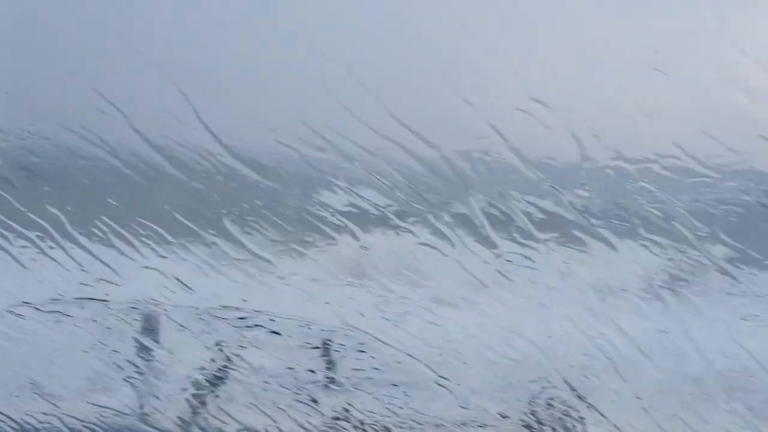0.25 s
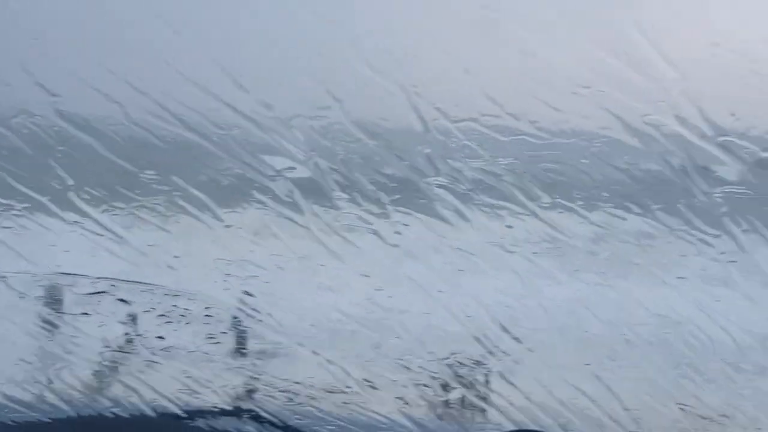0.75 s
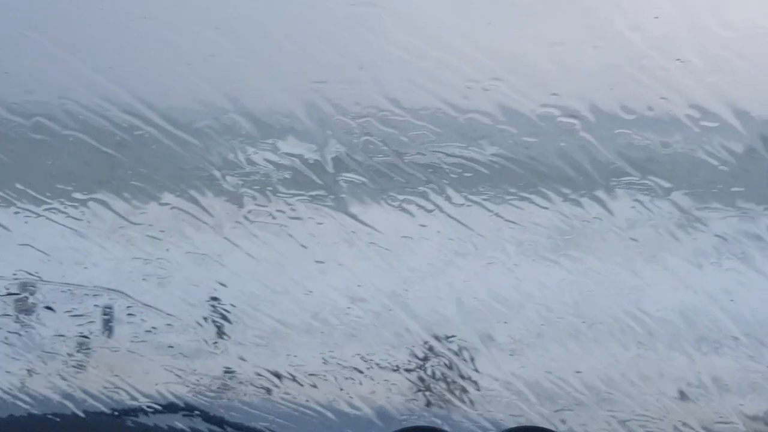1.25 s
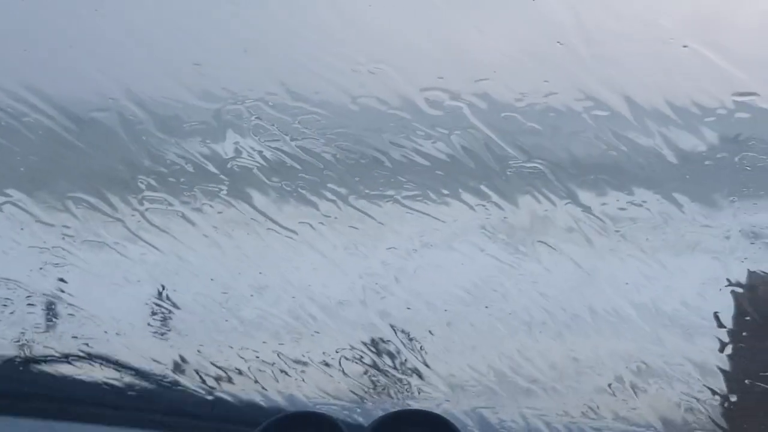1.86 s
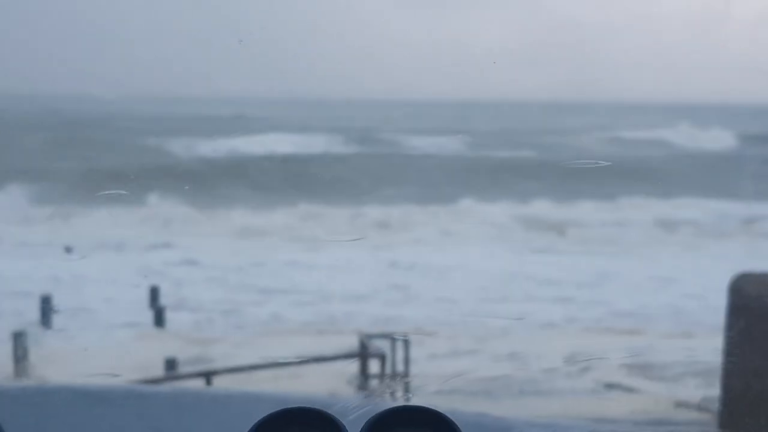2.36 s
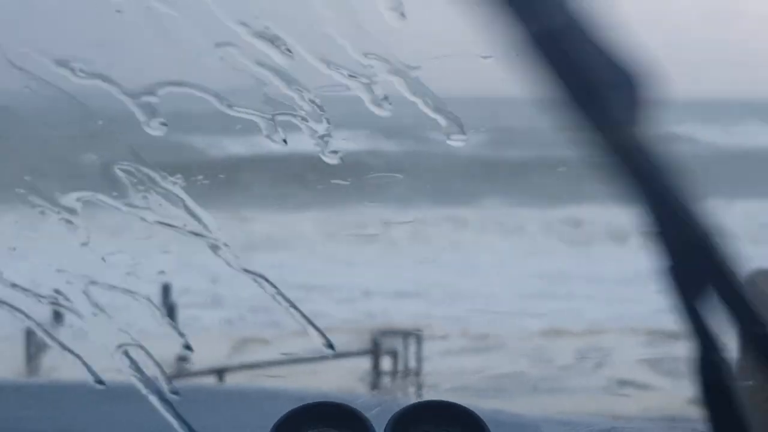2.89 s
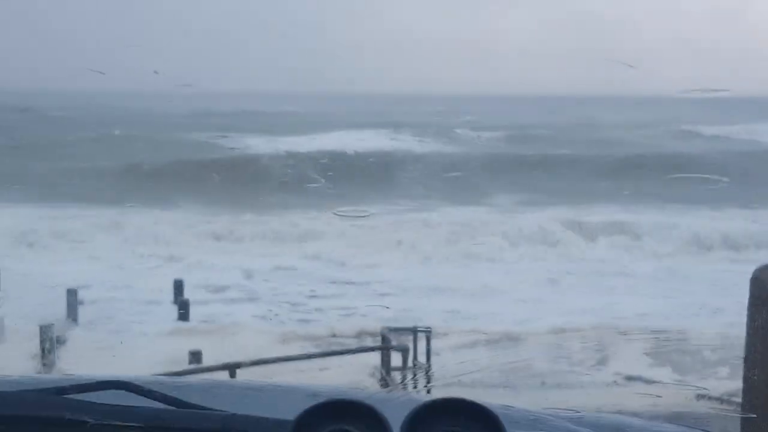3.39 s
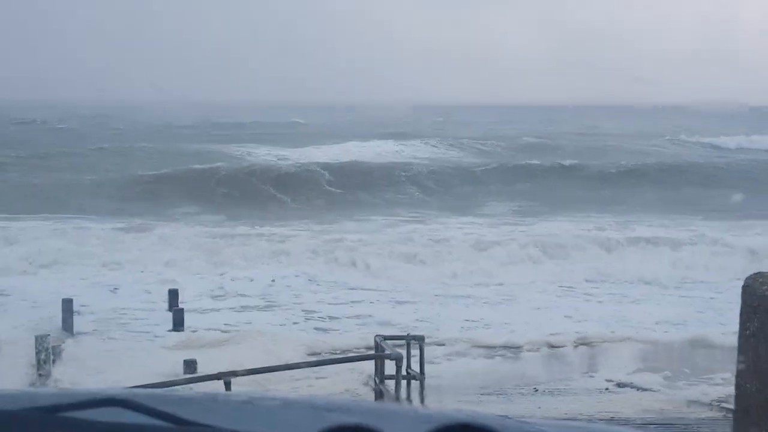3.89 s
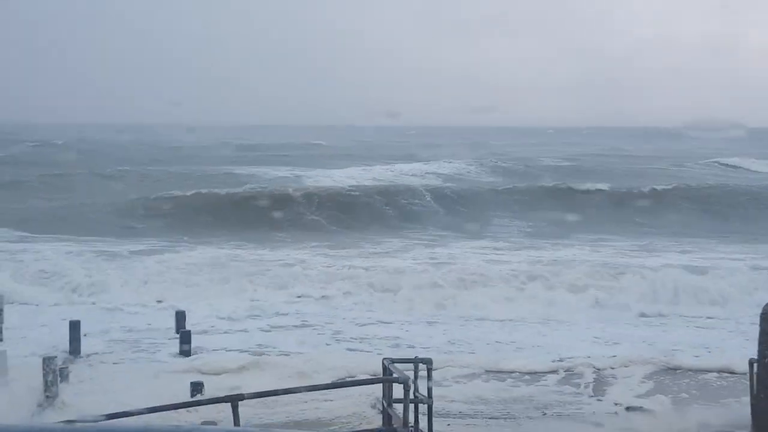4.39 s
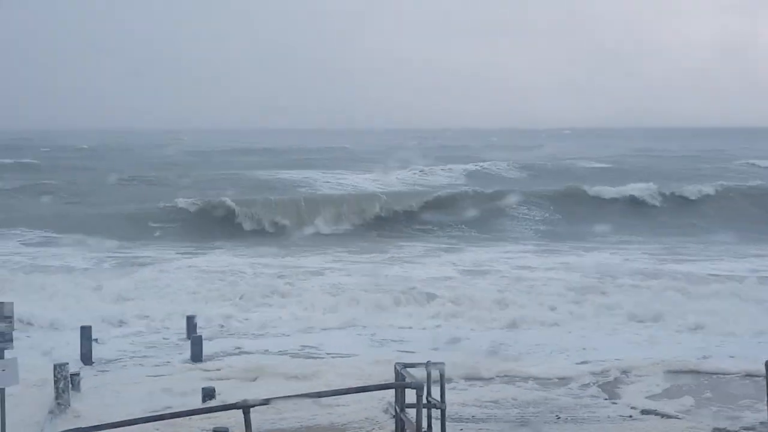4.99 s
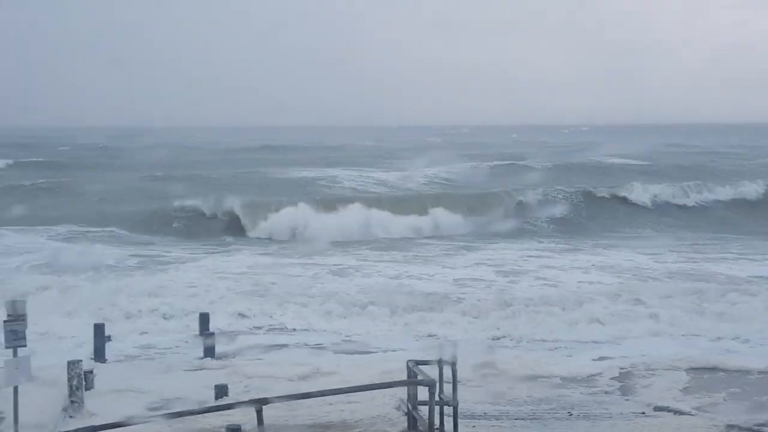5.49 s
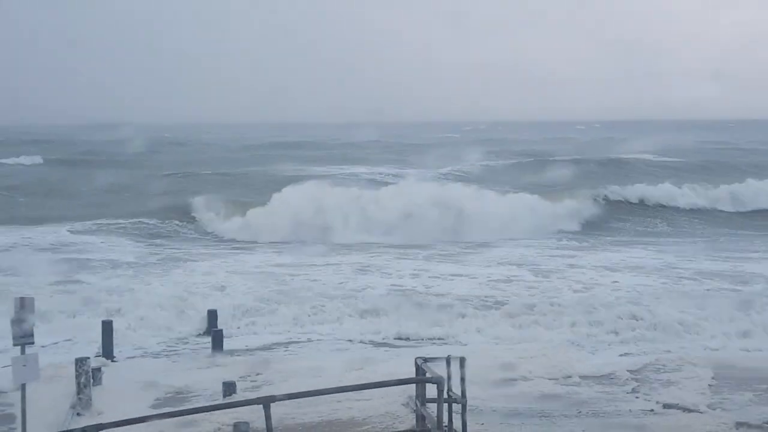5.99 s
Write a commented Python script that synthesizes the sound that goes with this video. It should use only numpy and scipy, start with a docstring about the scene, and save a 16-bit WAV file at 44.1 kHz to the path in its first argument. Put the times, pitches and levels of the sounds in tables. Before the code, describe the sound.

A close stereo cabin recording of storm weather. Wind buffets the van with low, muffled booming while rain and fine spray crackle and hiss over the windscreen. One wiper cycle thumps, groans and stutters across, drags back and knocks to rest by about three and a half seconds. Then wind and rain continue, with a few fat drops and a stronger, splashier gust near the end.

```python
"""Inside a van parked by a stormy sea. From the start the wind booms in the cabin, gale and surf roar, rain patters
on the glass, drums on the roof and comes in sheets of spray. Soon spray splashes and a heavy drop tap the glass.
Then the wipers sweep up and back: rubber rubs and judders on the windscreen and the arms knock. Heavy drops fall
during the way back and afterwards, and the gale swells towards the end. Wind, rain and rubbing are shaped noise;
judders are wavering tones; drops and knocks are short sounds that die away."""
import sys
import numpy as np
from scipy import signal
from scipy.fft import rfft, irfft
from scipy.io import wavfile
from scipy.ndimage import uniform_filter1d

SR = 44100
rng = np.random.default_rng(int(sys.argv[2]) if len(sys.argv) > 2 else 0)


def dump(signal):
    """Clip the signal to [-1, 1] and save it as 16-bit WAV at the path in sys.argv[1]."""
    limited = np.clip(np.atleast_2d(signal).T, -1, 1)
    pcm = np.round(limited * 32767).astype(np.int16)
    wavfile.write(sys.argv[1], SR, pcm)


N = 275625


def from_db(db):
    """Turn decibels into a gain."""
    return 10 ** (np.asarray(db) / 20)


def rms_one(x):
    """Scale a sound to an average strength (rms) of 1."""
    return x / np.sqrt(np.mean(x ** 2) + 1e-20)


def in_time(rows):
    """Draw straight lines between the points of a (t, value) table, sample by sample."""
    t, values = np.transpose(rows)
    return np.interp(np.arange(N) / SR, t, values)


def at_hz(points, hz):
    """Read a spectrum between its points, on a log-frequency axis."""
    known_hz, values = np.transpose(points)
    return np.interp(np.log(hz + 1), np.log(known_hz), values)


def drift(rate_hz):
    """Smooth random wandering of rms 1, changing about rate_hz times a second."""
    hz = np.fft.rfftfreq(N, 1 / SR)
    smoothed = rfft(rng.standard_normal(N)) / (1 + (hz / rate_hz) ** 2)
    return rms_one(irfft(smoothed, N))


def swell(start_s, length_s, attack_s, release_s):
    """Rise from 0 to 1, hold, and fall back once the length is over."""
    t = np.arange(N) / SR - start_s
    rise = t / attack_s
    fall = 1 - (t - length_s) / release_s
    return np.clip(np.minimum(rise, fall), 0, 1)


def panned(db):
    """Left and right gains for a level difference; positive is louder on the left."""
    return from_db(np.array([[db], [-db]]) / 2)


def add(out, start_s, sound):
    """Mix a sound in at a given time."""
    start = int(start_s * SR)
    out[:, start:start + sound.shape[1]] += sound[:, :N - start]


# How alike the two ears hear the cabin: (f/Hz, likeness 0-1)
EAR_LIKENESS = [(60, .999), (170, 1), (330, 0.92), (650, 0.4), (1300, 0.4), (2200, 0.4), (5000, 0),
                (15000, 0.02)]
RIGHT_LAG_S = 0.000395


def cabin_noise(spectrum, size=N):
    """Coloured noise, alike at both ears in the bass, different in the treble, a little later on the right."""
    hz = np.fft.rfftfreq(size, 1 / SR)
    mid, side = np.exp(2j * np.pi * rng.random((2, len(hz))))
    alike = np.clip(at_hz(EAR_LIKENESS, hz), 0, 1)
    ears = np.sqrt(1 + alike) * mid + np.sqrt(1 - alike) * side * [[1], [-1]]
    lag = np.exp(-2j * np.pi * hz * RIGHT_LAG_S * [[0], [1]])
    return rms_one(irfft(ears * lag * from_db(at_hz(spectrum, hz)), size))


def resonate(force, modes):
    """Let a force ring several resonances side by side; scaled to rms 1."""
    out = 0
    for k, (hz, width_hz, db) in enumerate(modes):
        b, a = signal.iirpeak(hz, hz / width_hz, fs=SR)
        sign = (-1) ** k  # neighbours have opposite signs
        out = out + sign * from_db(db) * signal.lfilter(b, a, force)
    return rms_one(out)


def steady(x, span_s):
    """Even out the random swells of a sound, so that its loudness can be set afterwards."""
    power = uniform_filter1d(np.mean(x ** 2, axis=0), max(int(span_s * SR), 1))
    return x / np.sqrt(np.abs(power) + 1e-9)


def impact(spectrum, t60, tail_db, tail_t60=0.17):
    """One blow: the struck spot dies away fast, the cabin rings on faintly; t60 is the time to fall 60 dB [s]."""
    t = np.arange(SR // 8) / SR
    spot = from_db(-60 * t / t60)
    cabin = from_db(tail_db - 60 * t / tail_t60)
    onset = 1 - np.exp(-t / 0.00037)
    return steady(cabin_noise(spectrum, size=len(t)), span_s=0.0039) * (spot + cabin) * onset


def shower(spectrum, per_s, spread_db, t60, tail_db, count=14):
    """Drops of random size land on spots from side to side, each spot with a ring of its own; rms 1."""
    at = np.flatnonzero(rng.random(N) < per_s / SR)
    size_db = spread_db * np.minimum(rng.exponential(1, len(at)), 5)
    sizes = from_db(size_db) * rng.choice([-1, 1], len(at))
    spots = rng.integers(0, count, len(at))
    out = 0
    for spot, side_db in enumerate(np.linspace(-5, 5, count)):
        hits = np.bincount(at[spots == spot], sizes[spots == spot], N)
        ring = rms_one(impact(spectrum, t60, tail_db))
        out = out + panned(side_db) * signal.oaconvolve(hits[None], ring, axes=1)[:, :N]
    return rms_one(out)


# Strength of the gale, which drives roar, patter and spray: (t/s, level/dB)
GALE_STRENGTH = [(0, 3), (0.25, 1), (0.42, 2.5), (0.66, 1.5), (0.83, -4), (1.02, -2), (1.25, -3.5),
                 (1.66, 1), (2.2, -4.5), (2.8, -1), (3.03, 1.5), (3.4, -3), (4.15, -4.5), (4.58, 3),
                 (5.08, 1), (5.5, 4), (5.8, 6), (6.25, 3.5)]


def gale():
    """Strength of the wind in dB from moment to moment; the gusts are its peaks."""
    return in_time(GALE_STRENGTH)


# Buffeting of the van's body: (t/s, level/dB)
BODY_BUFFETING = [(0, -16.5), (0.72, -15.5), (0.88, -20), (1.2, -17.5), (1.38, -26), (1.54, -21),
                  (1.83, -18.5), (2.32, -25.5), (2.76, -20.5), (3.3, -21), (3.52, -22), (3.72, -20.5),
                  (3.87, -24), (4.36, -22), (4.52, -20), (5.3, -22.5), (5.64, -21), (5.79, -17),
                  (6.25, -20)]
# Boom of the cabin and its panels: (f/Hz, width f/Hz, level/dB)
CABIN_BOOM = [(39.5, 17.4, -3), (57.4, 19.5, -4.5), (93, 20, -9.5), (118.6, 27.6, -11), (154.6, 74, -17.5)]
# Colour of the gale and surf: (f/Hz, level/dB)
ROAR_COLOUR = [(30, 6.5), (110, 4.5), (200, -2.5), (250, -2.5), (340, 1), (450, -3), (600, -7),
               (800, -12.5), (1200, -12), (1800, -16.5), (3000, -25), (8000, -35)]
ROAR_DB, ROAR_FOLLOWS = -32, 0.62  # level at a gale of 0 dB; dB gained per dB of gale


def wind(gust_db):
    """Turbulence pumps the cabin's low resonances under a broad roar of gale and surf."""
    pressure = cabin_noise([(15, -36), (26, -8), (38, 0.0), (170, -1), (300, -24.0), (1000, -45)])
    boom = steady(resonate(pressure, CABIN_BOOM), span_s=0.0917)
    boom_gain = from_db(in_time(BODY_BUFFETING) + 0.88 * drift(2.9))
    roar = cabin_noise(ROAR_COLOUR) * from_db(0.9 * drift(14.0))
    roar_gain = from_db(ROAR_DB + ROAR_FOLLOWS * gust_db)
    return boom_gain * boom + roar_gain * roar


# Colour of the drumming on the roof: (f/Hz, level/dB)
ROOF_COLOUR = [(500, -13), (1200, 2), (1650, -4), (2150, 2), (2700, -3), (3300, -4.5), (4000, 0.5),
               (5000, -8.5), (7000, -21.5), (9000, -44), (16000, -31)]


def roof():
    """Rain drums on the roof at an even average rate, whatever the gusts do."""
    drumming = shower(ROOF_COLOUR, per_s=1500, spread_db=4.5, t60=0.028, tail_db=-26, count=8)
    return drumming * from_db(-43)


# Colour of raindrops on the glass: (f/Hz, level/dB)
PATTER_COLOUR = [(250, -1.5), (600, -2), (1050, -3), (1650, -5.5), (2200, 0), (2700, -1), (3400, -8),
                 (4100, -8.5), (5500, -26.5), (7500, -45), (9000, -47), (16000, -48)]


def patter(density, flurry):
    """Small drops hit the glass; a stronger gale makes them both more frequent and louder."""
    drops = shower(PATTER_COLOUR, per_s=1600 * density, spread_db=4.0, t60=0.016, tail_db=-6.0)
    return drops * density * from_db(-40.5 + 0.97 * flurry) * panned(3.5)


# Colour of fine spray on the glass: (f/Hz, level/dB)
SPRAY_COLOUR = [(1500, -15), (2500, -1.5), (3300, 2), (4100, 5), (5500, 1), (7200, -1), (8500, -10.5),
                (9700, -9), (11200, -6), (13500, -7), (16000, -6.5)]
# Sheets of spray blown across the glass: (t/s, length t/s, level/dB)
SPRAY_SHEETS = [(0, 0.14, -41.5), (0.334, 0.51, -42), (1.44, .22, -39.5), (1.81, 0.095, -38.5),
                (2.498, 0.15, -42), (2.936, .17, -40), (3.334, .4, -43), (4.547, 0.1, -39.5),
                (4.914, .05, -38), (5.183, .55, -38.5), (5.923, 0.21, -44.5)]
SPRAY_DB, SPRAY_FOLLOWS = -42, 0.4  # level at a gale of 0 dB; dB gained per dB of gale


def spray(gust_db, density, flurry):
    """Very many tiny drops make a hiss that swells with each sheet; larger droplets tick within it."""
    hiss = shower(SPRAY_COLOUR, per_s=4500 * density, spread_db=4.0, t60=0.0062, tail_db=-4)
    ticks = shower(SPRAY_COLOUR, per_s=90 * density, spread_db=2.5, t60=0.022, tail_db=-23, count=6)
    power = from_db(SPRAY_DB + SPRAY_FOLLOWS * gust_db) ** 2
    for start_s, length_s, db in SPRAY_SHEETS:
        sheet = from_db(db) * swell(start_s, length_s, attack_s=0.045, release_s=0.14)
        power = power + sheet ** 2
    flicker = from_db(1.83 * flurry + 0.82 * drift(4))
    return (hiss + from_db(-6.5) * ticks) * np.sqrt(power) * flicker * panned(-1.8)


def rain(gust_db):
    """The stronger the gale, the more drops hit the glass; patter and spray share the same quick flurries."""
    flurry = drift(23)
    density = from_db(1.2 * gust_db)
    return patter(density, flurry) + spray(gust_db, density, flurry) + roof()


# Splashes of spray: (t/s, level/dB)
SPRAY_SPLASHES = [(0.384, -29), (0.394, -28), (0.4914, -40), (1.4173, -36), (2.381, -38.5), (3.5763, -42),
                  (3.7853, -37), (5.8722, -25), (6.0637, -30.5), (6.1953, -32)]


def splashes():
    """Clumps of spray burst against the glass, each a short blow in the colour of spray."""
    out = np.zeros((2, N))
    for start_s, db in SPRAY_SPLASHES:
        add(out, start_s, from_db(db) * impact(SPRAY_COLOUR, t60=0.07, tail_db=-11))
    return out


# Heavy drops: (t/s, level/dB, left-right level/dB)
HEAVY_DROPS = [(1.387, -29.5, 3), (2.927, -30, 2), (2.984, -26.5, 5), (3.229, -22, 5), (4.7256, -20, 3),
               (5.579, -26, 1), (5.7965, -17, 2), (5.918, -31, -5)]
# Colour of a heavy drop on the glass: (f/Hz, level/dB)
DROP_COLOUR = [(200, -7), (700, -3), (1400, -8), (2200, 3), (3000, -1), (3700, -12), (4400, -8),
               (8000, -33), (16000, -28)]


def heavy_drops():
    """Fat drops tap on the glass, each from its own side."""
    out = np.zeros((2, N))
    for start_s, db, side_db in HEAVY_DROPS:
        tap = impact(DROP_COLOUR, t60=0.056, tail_db=-17.5)
        add(out, start_s, from_db(db) * panned(side_db) * tap)
    return out


# Colour of rubber dragging on glass: (f/Hz, level/dB)
RUB_COLOUR = [(60, -4.5), (150, 0.5), (340, 3), (450, 0.5), (700, -12.5), (1200, -18), (2500, -28),
              (8000, -60)]
# Resonances of the windscreen under the blades: (f/Hz, width f/Hz, level/dB)
WINDSCREEN_MODES = [(118.6, 19.6, 6.5), (178.4, 26.5, 3), (212, 58, -7.5)]


def windscreen_boom():
    """The rubbing sets the windscreen's low resonances booming."""
    return steady(resonate(cabin_noise(RUB_COLOUR), WINDSCREEN_MODES), span_s=0.043)


# Wiper strokes, up and back: (t/s, length t/s, boom level/dB, rubbing level/dB)
WIPER_STROKES = [(1.723, 0.658, -23.5, -34.5), (2.506, 0.84, -26.5, -38.5)]


def strokes(boom):
    """Rubber drags across the glass with an uneven pull: a rubbing noise over the windscreen's boom."""
    rub = cabin_noise(RUB_COLOUR) * from_db(2.6 * drift(30))
    drag = from_db(2.1 * drift(22))
    out = np.zeros((2, N))
    for start_s, length_s, boom_db, rub_db in WIPER_STROKES:
        stroke = swell(start_s, length_s, attack_s=0.028, release_s=0.11)
        out += stroke * drag * (from_db(boom_db) * boom + from_db(rub_db) * rub)
    return out


# The rubber grabs and judders: (t/s, length t/s, level/dB, average slip rate f/Hz)
RUBBER_JUDDERS = [(1.715, 0.012, -18.5, 155), (1.805, 0.11, -22.5, 134.4), (2.029, 0.071, -12, 183),
                  (2.106, 0.058, -9, 121.4), (2.236, 0.02, -10, 166), (2.321, 0.028, -17, 175),
                  (3.22, 0.074, -28.5, 250)]
# Rasp of the rubber lip as it judders: (f/Hz, width f/Hz, level/dB)
LIP_RASP = [(347, 65, -3), (436, 82, -5), (730, 250, -3.5)]


def judders(boom):
    """Rubber grabs and slips over and over: a wavering tone, with a rasp that pulses on each slip."""
    rasp = resonate(cabin_noise(RUB_COLOUR), LIP_RASP)
    slip_time = np.cumsum(1 + 0.0512 * drift(50.0)) / SR  # running unevenly makes the pitch waver
    out = np.zeros((2, N))
    for start_s, length_s, db, slip_hz in RUBBER_JUDDERS:
        slip = np.sin(2 * np.pi * slip_hz * slip_time)
        scuff = from_db(-19) * rasp * (1 + 0.6 * slip)
        grab = swell(start_s, length_s, attack_s=0.015, release_s=0.027)
        out += from_db(db) * grab * (1.44 * slip + .22 * boom + scuff)
    return out


# Ringing of the wiper frame under a knock: (average f/Hz, level/dB, time to fall 60 dB t/s)
FRAME_RING = [(171.5, -38, 0.062), (246.5, 0.5, 0.073), (319, 3, 0.055), (391.6, 2, 0.07), (458, -8, 0.057),
              (580, -10.5, 0.064)]


def thud():
    """A padded knock rings the wiper frame, with pitches and phases a little different each time."""
    t = np.arange(SR // 6) / SR
    out = 0
    for hz, db, t60 in FRAME_RING:
        cycles = hz * rng.normal(1, 0.029) * t + rng.random()
        phase = 2 * np.pi * cycles + rng.normal(0, 0.25, (2, 1))  # the ears differ slightly
        out = out + from_db(db - 60 * t / t60) * np.sin(phase)
    return out * (1 - np.exp(-t / 0.00082))


# Knocks of the wiper arms: (t/s, thud level/dB, click level/dB)
ARM_KNOCKS = [(1.726, -27, -30), (1.7957, -14.5, -15.5), (1.902, -24.5, -45), (1.975, -27, -30),
              (2.081, -27, -30), (2.168, -18.5, -35), (2.331, -29, -26.5), (2.350, -23, -26.5),
              (2.518, -20.5, -36), (2.670, -27.5, -33), (2.862, -23.5, -45), (3.232, -22, -27),
              (3.256, -24, -33), (3.315, -29, -30)]
# Colour of the click: (f/Hz, level/dB)
CLICK_COLOUR = [(300, -24), (800, 0), (1150, 4.5), (1550, -4), (2000, -9), (3000, -25), (8000, -40),
                (16000, -50)]


def knocks():
    """The arms knock in their joints: each knock is a ringing thud and a noisy click together."""
    out = np.zeros((2, N))
    for start_s, thud_db, click_db in ARM_KNOCKS:
        add(out, start_s, from_db(thud_db) * thud())
        add(out, start_s, from_db(click_db) * impact(CLICK_COLOUR, t60=0.041, tail_db=-17.5))
    return out


def wipers():
    """One sweep up and back: strokes and judders share the windscreen's boom, and the arms knock."""
    boom = windscreen_boom()
    return (strokes(boom) + judders(boom) + knocks()) * panned(-0.69)


def scene():
    """Everything as heard from the front seat."""
    gust_db = gale()
    return wind(gust_db) + rain(gust_db) + splashes() + heavy_drops() + wipers()


def record(dry):
    """The recorder cuts off the top steeply, above 16000 Hz."""
    cut = signal.ellip(12, .2, 90, 16000, fs=SR, output="sos")  # 0.2 dB ripple below, 90 dB down above
    return signal.sosfilt(cut, dry)


dry = scene()
out = record(dry)
dump(out)
```